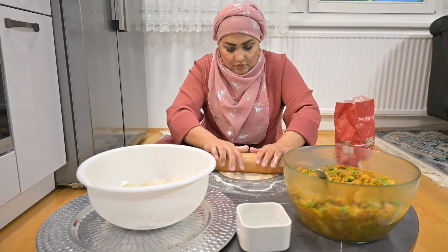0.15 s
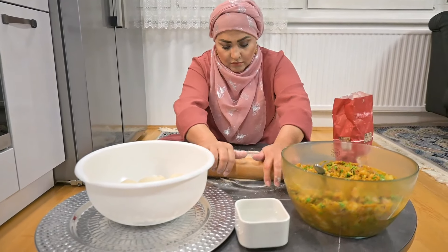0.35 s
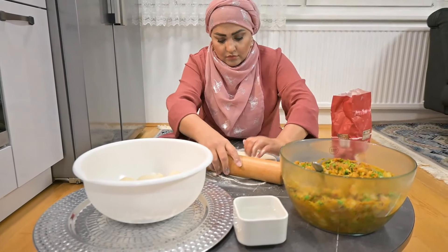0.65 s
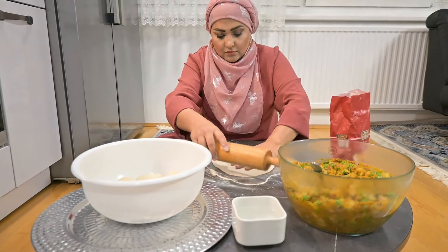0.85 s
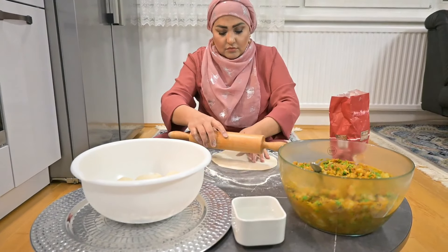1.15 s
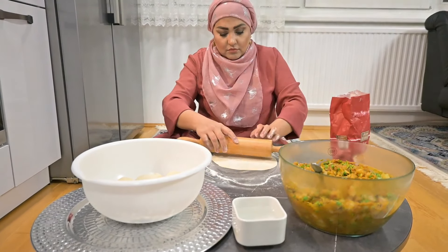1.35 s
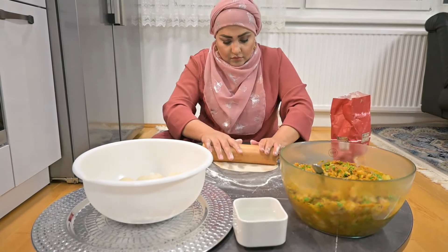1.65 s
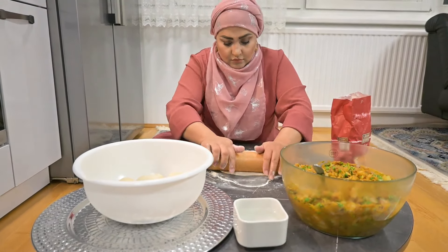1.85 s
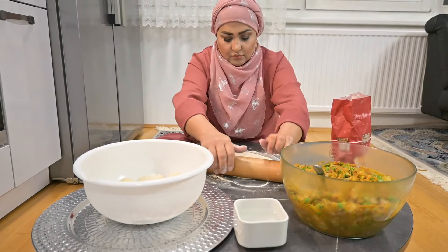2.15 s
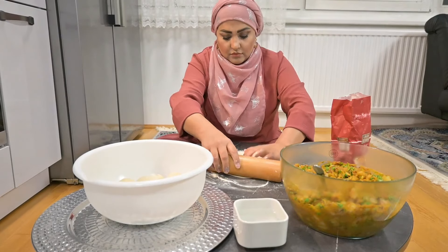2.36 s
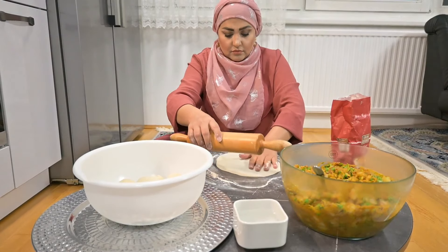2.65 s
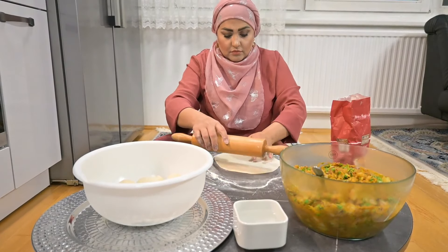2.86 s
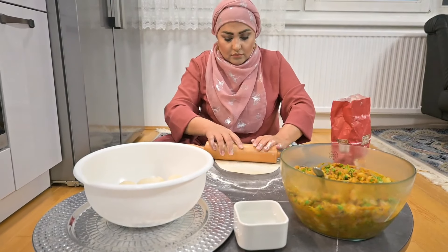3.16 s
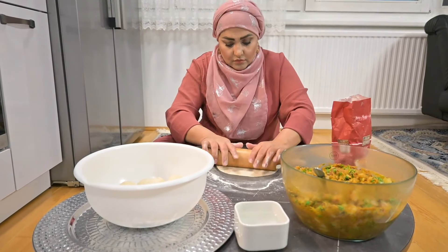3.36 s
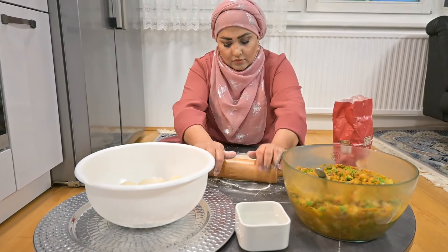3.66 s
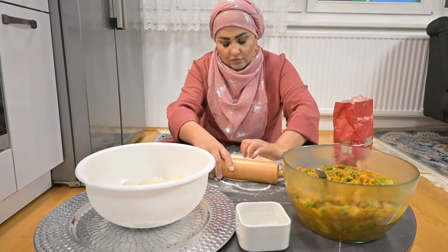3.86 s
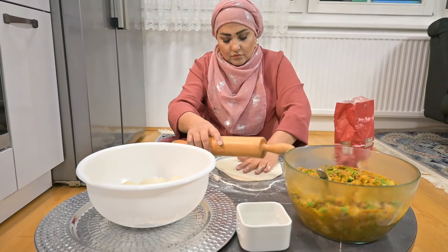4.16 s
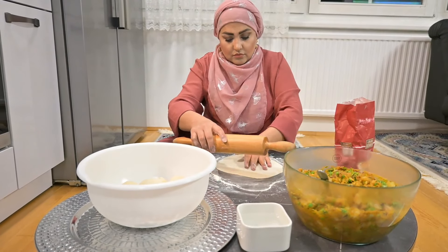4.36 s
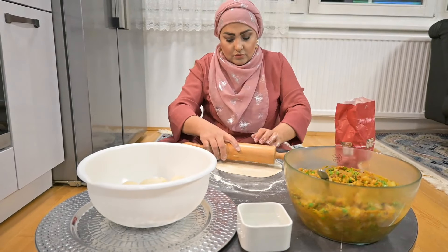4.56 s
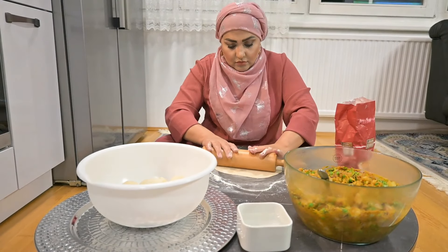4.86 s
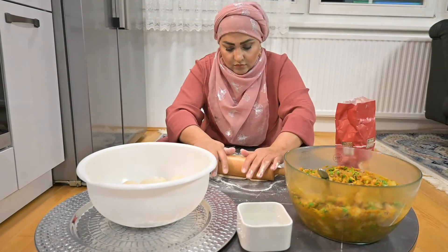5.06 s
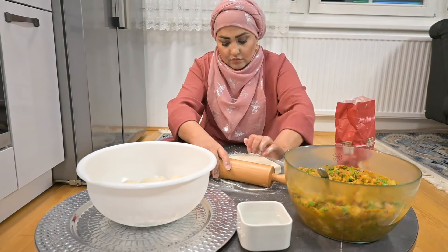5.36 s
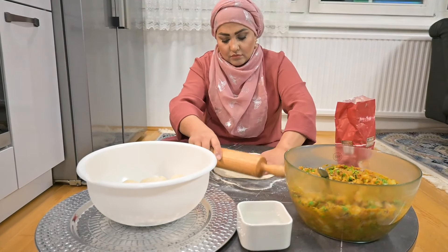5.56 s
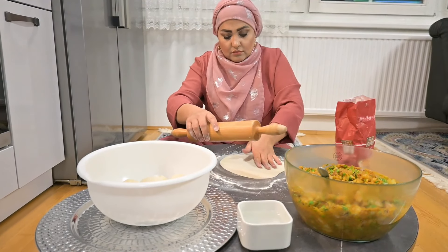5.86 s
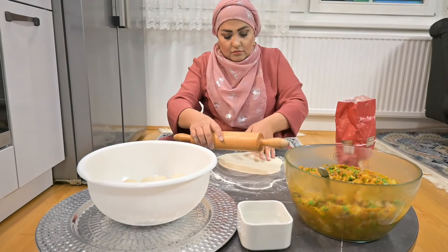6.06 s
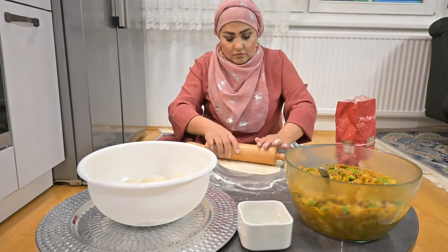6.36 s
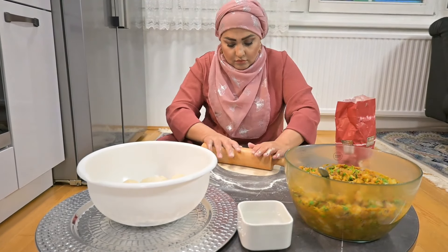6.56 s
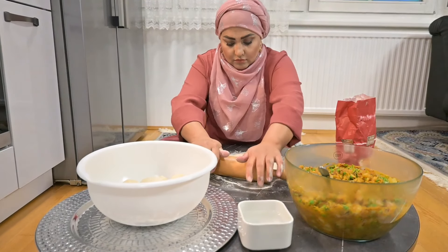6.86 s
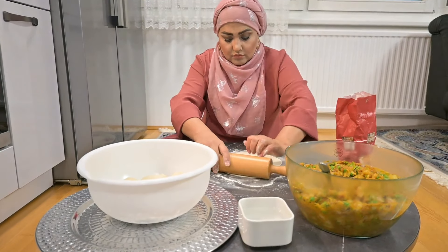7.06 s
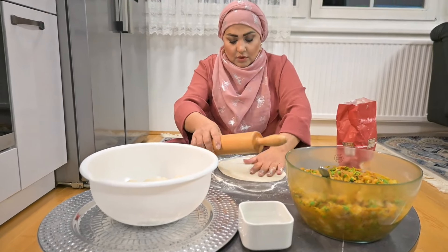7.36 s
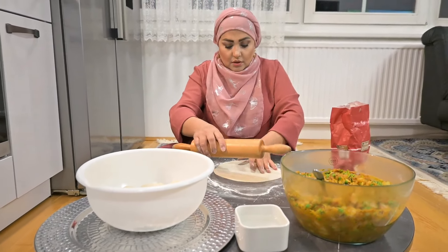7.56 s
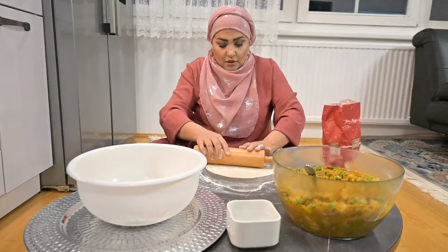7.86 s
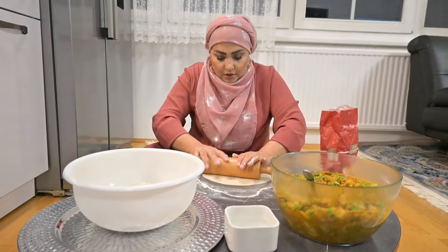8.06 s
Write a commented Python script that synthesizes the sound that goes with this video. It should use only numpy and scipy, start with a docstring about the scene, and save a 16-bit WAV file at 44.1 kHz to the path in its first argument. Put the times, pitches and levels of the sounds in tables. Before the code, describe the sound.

A wooden rolling pin rolls dough on a floured table. Dull, softly rumbling strokes alternate with lighter, brighter swishes as a hand spins the dough. The pin thuds on the table about once a second, and an early knock makes a glass bowl clink briefly. The loudest thud comes late, followed by a short wooden drag. Close microphones hear it in a small, hard-walled kitchen with a steady low hum.

```python
"""Rolling out dough

A wooden pin rolls dough on a low, floured table; between rolls a hand spins the dough.
Flour hisses and the table rumbles under each stroke. The pin thuds on the table top, which
rings low and once shakes a glass bowl on its tray. Two close microphones hear it all in a
small, hard kitchen with a steady hum."""
import sys
import numpy as np
from scipy import signal
from scipy.io import wavfile
from scipy.ndimage import uniform_filter1d

SR = 44100
rng = np.random.default_rng(int(sys.argv[2]) if len(sys.argv) > 2 else 0)


def unload_audio(sound):
    """Save the sound as a 16-bit wav file, at the path given as the first command line argument."""
    columns = np.transpose(np.atleast_2d(sound))
    # keep every value between -1 and 1, then stretch to whole-number steps
    steps = np.round(np.clip(columns, -1, 1) * 32767)
    wavfile.write(sys.argv[1], SR, steps.astype(np.int16))


N = 362268
HIT_SAMPLES = SR * 3 // 5

# Dull, rumbling rolls of the pin and brighter, lighter spins by hand:
# fastest moment t/s, rise/s, fall/s, hiss level/dB, brightness/(dB per octave), rumble level/dB
STROKES = [(0.23, 0.37, 0.31, -41, -3, -47.5), (1.04, 0.33, .27, -44.5, 1.5, -58.5),
           (1.9, 0.35, .25, -41.5, -4, -48), (2.75, 0.28, 0.17, -43, .5, -63.5),
           (3.51, 0.32, .26, -41.5, -2.5, -47.5), (4.26, 0.29, 0.29, -43, -1, -64),
           (5.05, 0.32, 0.29, -42, -4.5, -48.5), (5.79, .26, 0.41, -44, 2, -58.5),
           (6.77, 0.31, .2, -39, -5, -49), (7.48, 0.34, 0.27, -42.5, 1, -50),
           (8.02, 0.06, 0.093, -51.5, -11.5, -61), (8.17, 0.28, 0.2, -41.5, -3.5, -47.5)]
def strokes():
    """The faster the dough is rolled or spun, the louder the flour hisses and the table rumbles."""
    speed = np.array([swell(*row[:3]) for row in STROKES])
    hiss_db, brightness, rumble_db = np.transpose(STROKES)[3:]
    hiss = gain_of(hiss_db) @ speed ** 1.68  # hiss grows more steeply with speed than rumble
    rumble = gain_of(rumble_db) @ speed ** 1.3
    tilt = brightness @ speed / (speed.sum(0) + 1e-6)
    flour_and_tray = (hiss + tray_rattle()) * flour_hiss(tilt)  # both use the same noise
    return flour_and_tray + hand_rustle(hiss) + rumble * rubbed_table((-57.0, 4.5, 1.5, 5.5))


# The tone of rubbed flour: f/Hz, relative level/dB
FLOUR_TONE = [(410, -19), (750, -18.5), (1080, -21), (1420, -11), (1900, -14), (2800, -13.5), (3900, -15.5),
              (6000, -21.5), (9000, -32), (16000, -44)]
# Pitches the wooden pin boosts: f/Hz, width/Hz, boost/dB
PIN_PEAKS = [(1558, 158, 2.5), (2330, 330, 4), (3270, 490, 3)]
def flour_hiss(tilt):
    """Flour rubs under the dough, and the wood of the pin colours the hiss."""
    return noise(lambda hz: value_at(FLOUR_TONE, hz) + humps(PIN_PEAKS, hz),
                 patchy_db=1.63, flicker_db=0.83, tilt=tilt)


ZONES_HZ = (105, 205, 430, 760)  # centres of the table's bass, low, middle and upper notes
# The notes the table top rings at: f/Hz, relative level/dB, time to fade by 60 dB/s
TABLE_NOTES = [(73, -4.5, 0.49), (110, -5.5, 0.16), (128.9, -3, 0.35), (179.6, -1, 0.26),
               (203.1, -1.5, 0.23), (263, -8, 0.25), (304.2, 0.5, 0.13), (337, -7.5, 0.25),
               (424.8, -8, 0.33), (483.2, 4.5, 0.095), (535.2, -6.5, 0.17), (623, -6, 0.095),
               (717.6, -3, 0.14), (785, -2.5, 0.056), (898, -10, 0.1), (996, -20.5, 0.22)]
def table_ring(zones_db, t, scatter_db=0):
    """The table top rings after a push, with each zone of notes turned up or down."""
    lift_db = np.interp(np.array(TABLE_NOTES)[:, 0], ZONES_HZ, zones_db)
    return ring(TABLE_NOTES, lift_db + scatter_db, t)


def rubbed_table(zones_db):
    """Uneven bumps under the pin keep the table ringing, which makes a rumble."""
    bumps = rng.standard_normal(N)
    bumps *= gain_of(2.2 * np.minimum(rng.exponential(1, N // 64 + 1), 3).repeat(64)[:N])
    wood = table_ring(zones_db, np.arange(SR // 3) / SR)
    return unit_level(signal.fftconvolve(bumps, wood)[:N])


# Blows of the pin: t/s, level/dB, then relative to that: bass/dB, middle/dB, upper/dB, crack/dB
KNOCKS = [(0.705, -20, -17, 2, -6, -10.5), (0.8265, -16.5, -49, 4.5, 6.5, 4),
          (1.453, -23.5, -4, -19, -17, -22), (1.481, -25, -3, -12, -23, -16),
          (1.507, -27.5, -33, -38, -23, -20), (2.065, -42, -3, 7, 5, 4), (2.371, -26, -25, -1, -8.5, -7),
          (2.404, -33, -21, -10, 3.5, 3.5), (2.461, -31.5, -5, -2, -10, -4),
          (3.108, -25.5, -2.5, -15.5, -17.5, -16.5), (3.988, -18.5, -12, -6.5, -29, -11),
          (4.675, -18, -5, -9, -17, -21), (5.288, -31, -32, -17, -5, -7),
          (5.4697, -16, -16, 6.5, -8.5, -18), (5.484, -29.5, -18, 2, -2, -2),
          (6.358, -11.5, -7.5, -13.5, -16.5, -29), (6.367, -31.5, -4, 1, 6.5, 0),
          (7.002, -36.5, -12, -12, -22, -22), (7.135, -37.5, -16, -2.5, -6, -6),
          (7.235, -36, -5, -22, -4, -2.5), (7.827, -22.5, -5, -18, -17, -17)]
def knock(blow_db, bass_db, middle_db, upper_db, crack_db, chance):
    """The spot that is hit sets which table notes ring; a hard blow adds the clack of the pin."""
    t = np.arange(HIT_SAMPLES) / SR
    zones_db = (bass_db, 0, middle_db, upper_db)
    ringing = table_ring(zones_db, t, scatter_db=1.8 * chance[:len(TABLE_NOTES)])
    thud = sum(gain_of(db) * np.sin(2 * np.pi * hz * t) * np.exp(-t * hz / 1.27)
               for hz, db in zip(ZONES_HZ, zones_db))  # a short push in each zone
    cushion = (1 - np.exp(-t / 0.0021)) ** 2  # dough softens the start
    wood = -(gain_of(-4.0) * ringing + gain_of(7.5) * thud) * cushion
    snap = band_noise(chance, 950, 3300, order=3) * (np.exp(-t / 0.00075) + 0.21 * np.exp(-t / 0.053))
    clack = sum(np.sin(2 * np.pi * hz * t) * np.exp(-np.pi * width * .4 * t)
                for hz, width, _ in PIN_PEAKS)
    crack = gain_of(crack_db) * (snap + 1.07 * clack) * (1 - np.exp(-t / 0.0024))
    return gain_of(blow_db) * (wood + crack)


# Small, sharp taps: t/s, level/dB, f/Hz
TICKS = [(0.827, -38, 7240), (0.8277, -11, 800), (2.421, -35, 3260), (3.987, -26, 2160), (4.865, -40, 6000),
         (5.4687, -36, 3870), (5.585, -34, 3620), (6.358, -44, 6000), (6.501, -30.5, 6900),
         (7.373, -36, 12000), (7.482, -26.5, 890), (8.195, -20, 1680)]
def tick(db, hz, chance):
    """A brief hard contact makes a tiny blip of tone inside a puff of noise."""
    t = np.arange(len(chance)) / SR
    puff = band_noise(chance, hz / 2, min(2 * hz, 15000), order=2)
    return -gain_of(db) * (0.71 * np.sin(2 * np.pi * hz * t) + 0.24 * puff) * np.exp(-t / 0.0011)


def pin_drag(length_s=.225, start_hz=730, end_hz=268, width_hz=200, rise_s=.008, fall_s=.025):
    """The end of the pin slides over bare wood, and the notes that ring best move down."""
    t = np.arange(0, length_s, 1 / SR)
    along = t / length_s
    sweep = np.exp(2j * np.pi * np.cumsum(start_hz * (end_hz / start_hz) ** along) / SR)
    wood = rubbed_table((-45, 7.5, 5.0, 8.0))[:len(t)]
    pole = np.exp(-np.pi * width_hz / SR)
    scrape = sweep * signal.lfilter([1 - pole], [1, -pole], wood / sweep)  # keeps a sinking band
    press = np.minimum(t / rise_s, (length_s - t) / fall_s).clip(max=1)
    return press * gain_of(-31.5 - 7.5 * along) * unit_level(scrape.real)


CLINK_S = .827  # when the bowl jumps
# The glass bowl's notes, many in close pairs: f/Hz, relative level/dB, time to fade by 60 dB/s
BOWL_NOTES = [(1209, -1, .5), (1217, -1, .5), (1455, -15, .3), (1578, -15, .3), (2255, -7, .3),
              (2290, -11, .25), (3187, -4, .3), (3233, -3, .33), (4290, -5, .2), (4348, -3, .2),
              (5561, -16, .22), (5597, -15, .27), (6930, -20, .2), (6954, -16, .25), (8500, -25, .15),
              (10080, -27, .2), (11880, -29, .25)]
def bowl_clink():
    """The bowl chatters on its tray for a moment, so its notes ring unevenly."""
    t = np.arange(HIT_SAMPLES) / SR
    chatter = .035 * rng.standard_normal(2600) * np.exp(-t[:2600] / .025)
    chatter[0] = 1  # the first, strongest hit
    glass = ring(BOWL_NOTES, np.full(len(BOWL_NOTES), -28), t)
    return signal.fftconvolve(glass, chatter)


def tray_rattle(fade_s=0.45):
    """The loudness of the tray's rattle, dying away after the bowl jumps."""
    t = np.arange(N) / SR - CLINK_S
    return (t > 0) * gain_of(-32.5 - 60 * abs(t) / fade_s)


# The tone of the rustle: f/Hz, relative level/dB
RUSTLE_TONE = [(2500, -20), (6000, 0), (10000, -3), (16000, -8)]
# Shifts of the hands: loudest moment t/s, rise/s, fall/s, level/dB
HAND_SHIFTS = [(0.0, .1, 0.023, -57), (0.48, 0.21, 0.12, -61), (1.5, 0.048, 0.15, -56.5),
               (1.7, .1, 0.16, -73), (2.4, 0.048, 0.16, -67), (3.2, 0.13, .12, -59), (4.72, .1, .15, -62),
               (5.2, .1, .1, -63), (6.39, .03, .08, -58.5), (6.53, 0.051, .08, -64), (7.6, 0.23, 0.04, -63),
               (8.0, .2, 0.048, -57.5)]
def hand_rustle(hiss):
    """Cloth and dust rustle as the hands shift, and faintly along with the flour's hiss."""
    loudness = gain_of(-20.5) * hiss + sum(gain_of(db) * swell(*row) for *row, db in HAND_SHIFTS)
    return loudness * noise(lambda hz: value_at(RUSTLE_TONE, hz), patchy_db=5.0, flicker_db=0.5)


# How long the kitchen echoes: f/Hz, time to fade by 60 dB/s
ECHO_TIMES = [(100, 0.43), (400, 0.43), (1500, 0.64), (5000, 0.51), (12000, 0.15)]
def kitchen_echo(sound):
    """Hard walls send back many small echoes, and each pitch fades at its own speed."""
    taps = np.zeros((2, SR))
    at = np.arange(200, SR - 20, 20) + rng.integers(0, 20, (2, (SR - 201) // 20))
    np.put_along_axis(taps, at, rng.choice([-1., 1.], at.shape), 1)
    hz, t, spectrum = signal.stft(taps, SR, nperseg=512)
    fade = gain_of(-60 * t / value_at(ECHO_TIMES, hz)[:, None])
    tail = signal.istft(microphone_pair(*spectrum, hz) * fade, SR, nperseg=512)[1]
    return signal.fftconvolve(sound[None], tail / np.linalg.norm(tail[0]), axes=1)[:, :N]


# The tone of the room's hum: f/Hz, relative level/dB
HUM_TONE = [(12, -51), (20, -17), (53, -2.5), (93, -5), (127, 3), (146, -21), (210, 1), (228, -11),
            (357, -9), (459, -15), (1290, -18.5), (1710, -15.5), (3000, -23.5), (4810, -27.5),
            (8890, -31.5), (16000, -42.5)]
# A narrow band of hiss inside the hum: f/Hz, width/Hz, boost/dB
WHINE_PEAK = [(1675, 150, 4.5)]
def room_hum():
    """A steady low hum with a faint whine in it."""
    return gain_of(-49.5) * noise(lambda hz: value_at(HUM_TONE, hz) + humps(WHINE_PEAK, hz),
                                  patchy_db=1.5, flicker_db=1.0)


# How alike left and right sound: f/Hz, likeness (1 = the same, 0 = unrelated)
LIKENESS = [(60, 0.96), (400, 0.93), (1000, 0.79), (2000, 0.62), (4000, 0.28), (8000, 0.12), (15000, -0.24)]
def microphone_pair(left, other, hz):
    """Two close microphones hear nearly the same bass but different treble."""
    same = value_at(LIKENESS, hz)[:, None]
    return np.array([left, same * left + np.sqrt(1 - same ** 2) * other])


def noise(tone_db, patchy_db, flicker_db, tilt=0):
    """Stereo noise with drifting louder patches and a flicker shared by all pitches."""
    frames, hz = N // 256 + 5, np.fft.rfftfreq(1024, 1 / SR)
    a, b, c, d, patches = rng.standard_normal((frames, 513, 5)).T
    patches = uniform_filter1d(patches, size=10, axis=0)  # smooth across pitch
    patches = unit_level(uniform_filter1d(patches, size=10, axis=1))  # then across time
    flicker = unit_level(uniform_filter1d(rng.standard_normal(frames), size=3))
    spectrum = microphone_pair(a + 1j * b, c + 1j * d, hz)
    octaves = np.log2(np.clip(hz, 1000, 4500) / 2300)[:, None]
    tilt = np.resize(np.broadcast_to(tilt, N)[::256], frames)
    spectrum *= gain_of(tone_db(hz)[:, None] + tilt * octaves + patchy_db * patches
                        + flicker_db * flicker)
    return unit_level(signal.istft(spectrum, nperseg=1024, noverlap=768)[1][:, :N])


def band_noise(chance, low_hz, high_hz, order):
    """Keeps the part of a noise between two pitches."""
    band = signal.butter(order, [low_hz, high_hz], "bandpass", fs=SR, output="sos")
    return unit_level(signal.sosfilt(band, chance))


def ring(notes, lift_db, t):
    """Adds up fading pure tones, each turned up or down by its own amount."""
    hz, db, fade_s = np.transpose(notes)[:, :, None]
    return (gain_of(db + lift_db[:, None] - 60 * t / fade_s) * np.sin(2 * np.pi * hz * t)).sum(0)


def swell(peak_s, rise_s, fall_s):
    """The speed of one movement, from 0 up to 1 and back."""
    t = np.arange(N) / SR - peak_s
    return np.cos(np.pi / 2 * np.clip(t / np.where(t < 0, rise_s, fall_s), -1, 1)).clip(0)


def humps(peaks, hz):
    """A rounded boost in dB around each peak."""
    return sum(db / (1 + ((hz - centre) / (width / 2)) ** 2) for centre, width, db in peaks)


def value_at(points, hz):
    """Looks up a pitch in a table, gliding between its rows."""
    f, value = np.transpose(points)
    return np.interp(np.log(hz + 1), np.log(f + 1), value)


def gain_of(db):
    """Turns decibels into a number to multiply by."""
    return 10 ** (np.asarray(db) / 20)


def unit_level(x):
    """Scales a signal to an average (rms) level of 1."""
    return x / np.sqrt(np.mean(x ** 2) + 1e-20)


def add(mix, start_s, sound):
    """Mixes a sound in at its start time."""
    part = mix[round(start_s * SR):][:len(sound)]
    part += sound[:len(part)]


def scene():
    """Knocks, a clink, ticks and a drag echo in the kitchen, over the strokes and the hum."""
    hits = np.zeros(N)
    for start_s, *row in KNOCKS:
        add(hits, start_s, knock(*row, rng.standard_normal(HIT_SAMPLES)))
    add(hits, CLINK_S, bowl_clink())
    for start_s, *row in TICKS:
        add(hits, start_s, tick(*row, rng.standard_normal(600)))
    add(hits, start_s=6.708, sound=pin_drag())
    bass_cut = signal.butter(3, 75, "highpass", fs=SR, output="sos")  # a small table has no deep bass
    hits = signal.sosfilt(bass_cut, hits)
    direct = np.array([np.roll(hits, 1), hits])  # the left microphone hears a blow one sample later
    return direct + room_hum() + gain_of(-8.0) * kitchen_echo(hits) + strokes()


def record(dry):
    """Cuts off the very highest treble."""
    treble_cut = signal.firwin(1023, 15750, window=("kaiser", 9), fs=SR)
    return signal.oaconvolve(dry, treble_cut[None], "same")


dry = scene()
out = record(dry)
unload_audio(out)
```